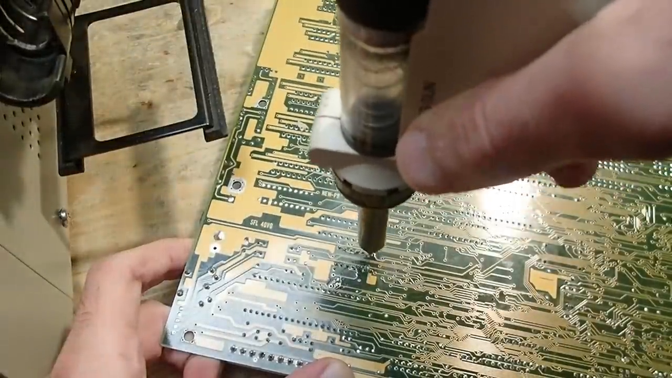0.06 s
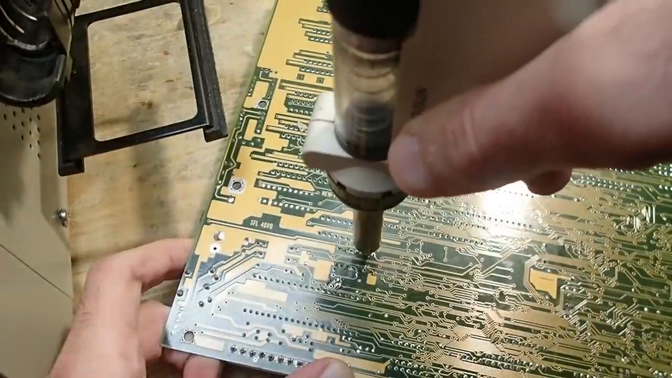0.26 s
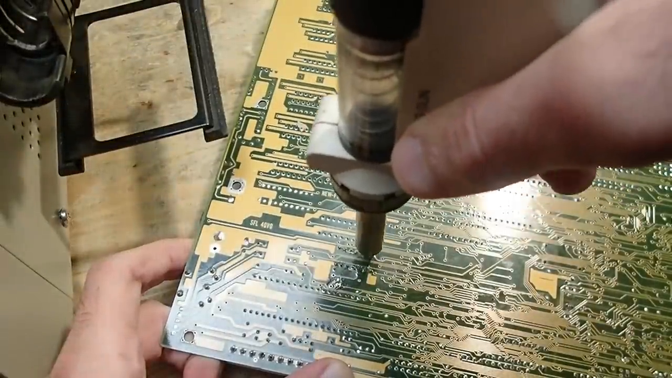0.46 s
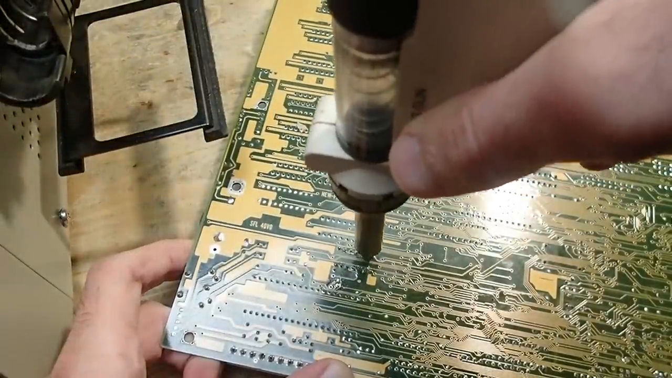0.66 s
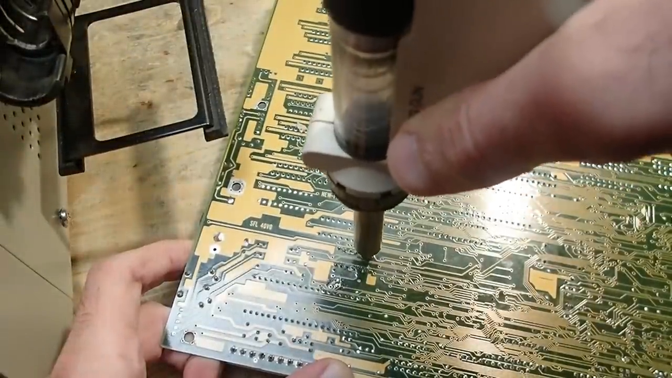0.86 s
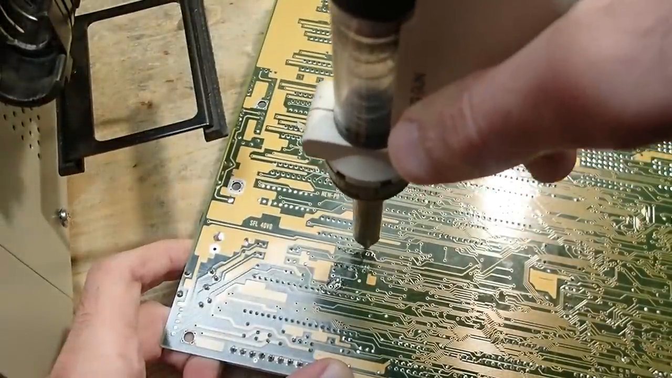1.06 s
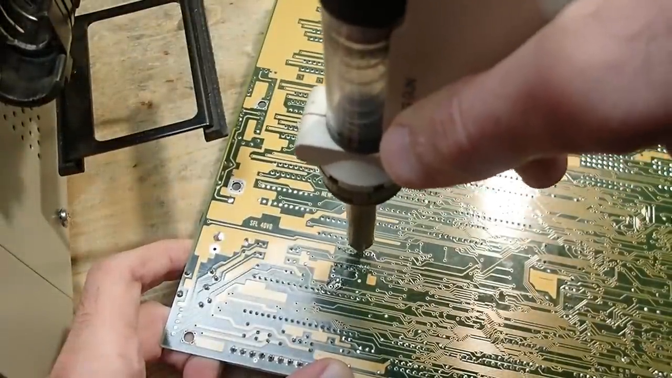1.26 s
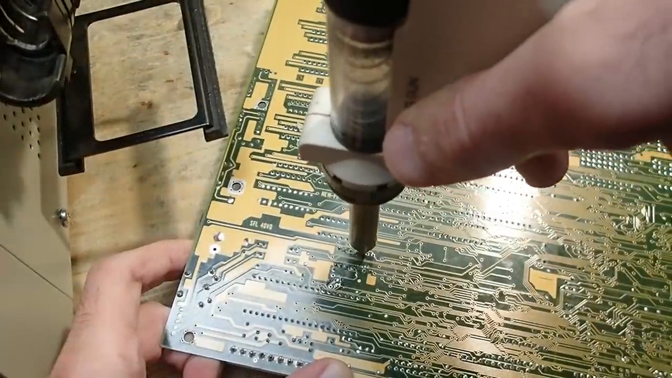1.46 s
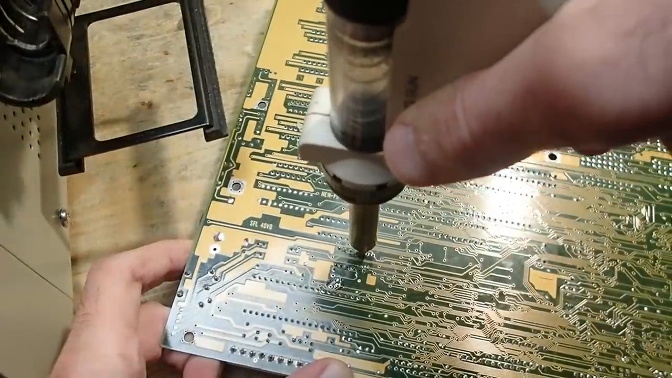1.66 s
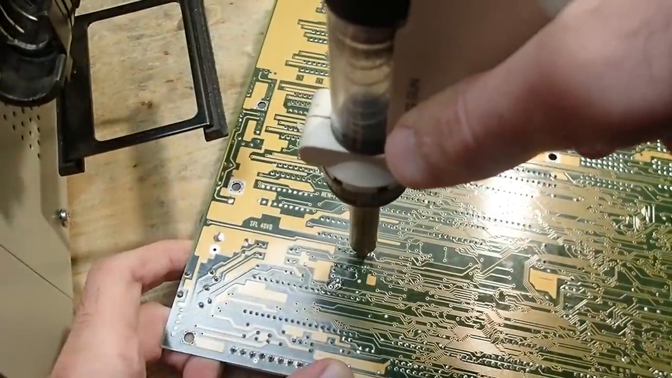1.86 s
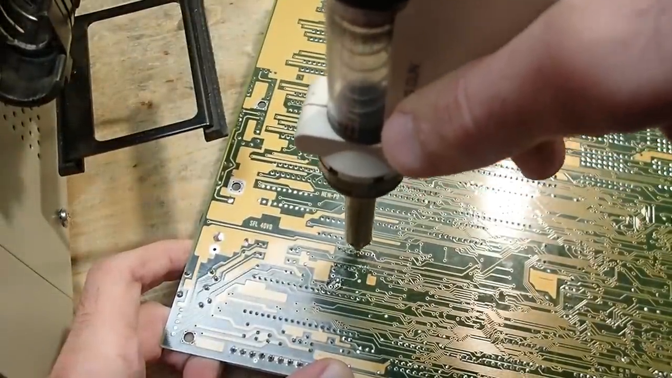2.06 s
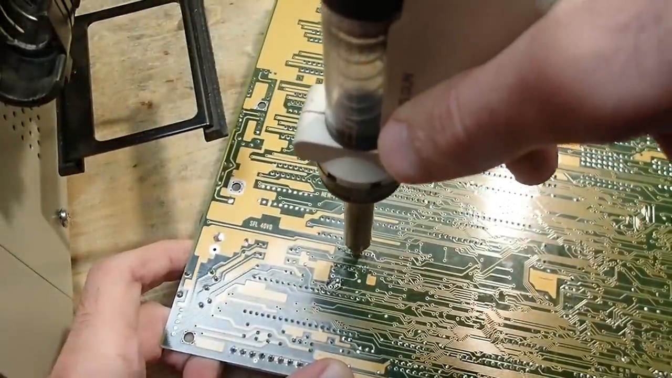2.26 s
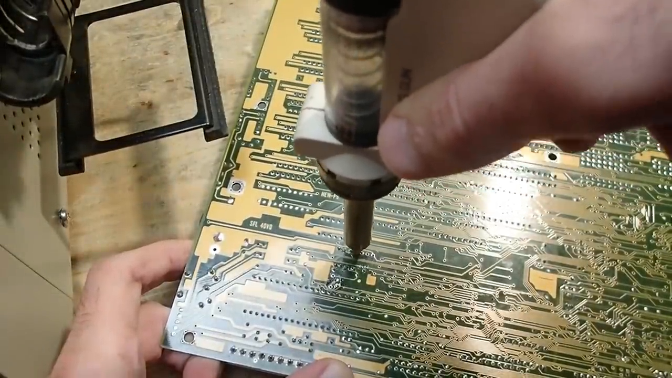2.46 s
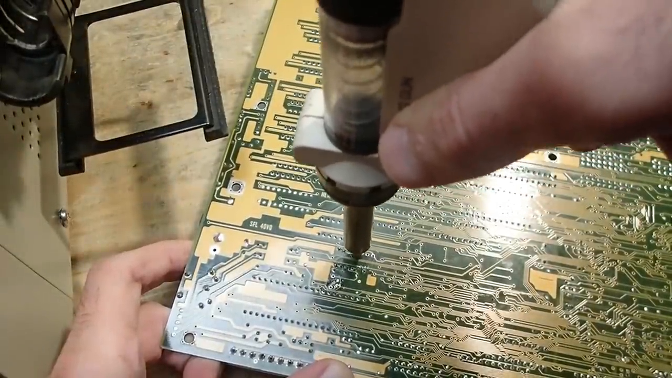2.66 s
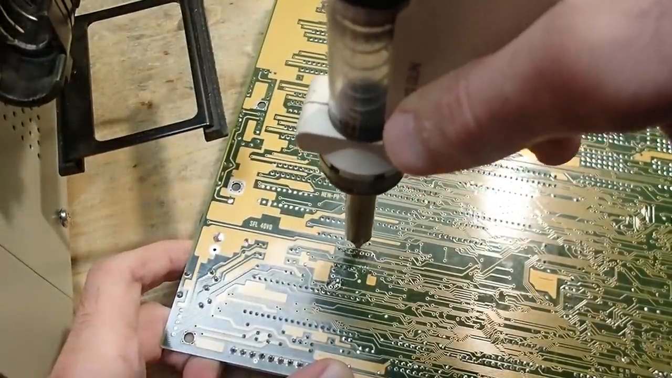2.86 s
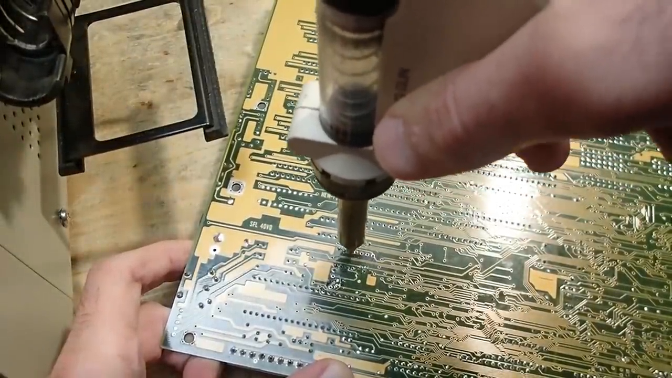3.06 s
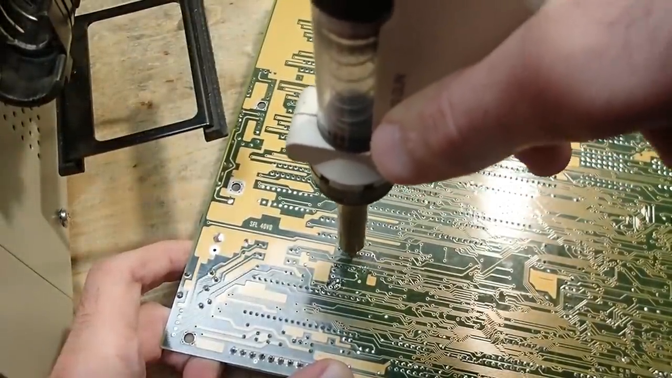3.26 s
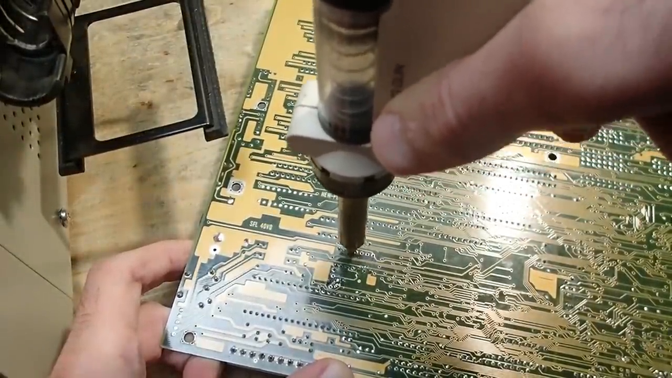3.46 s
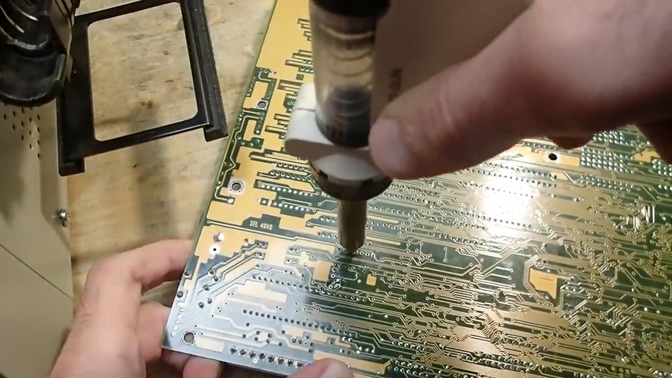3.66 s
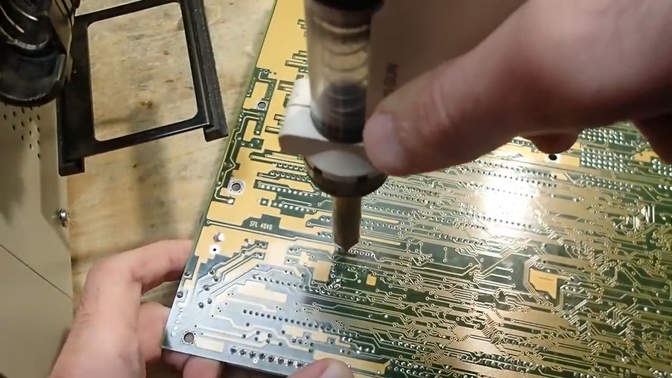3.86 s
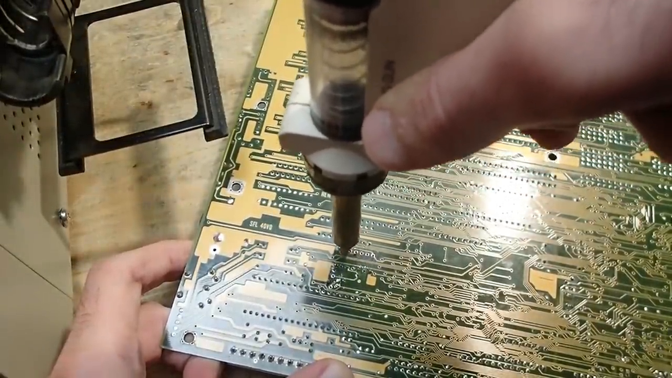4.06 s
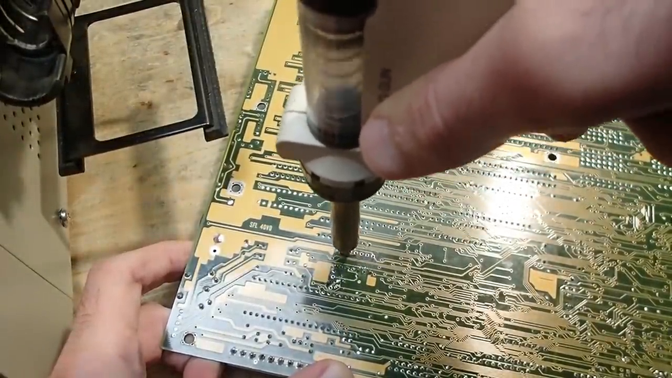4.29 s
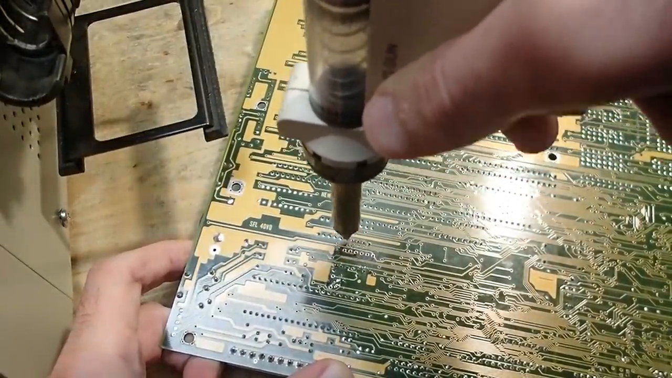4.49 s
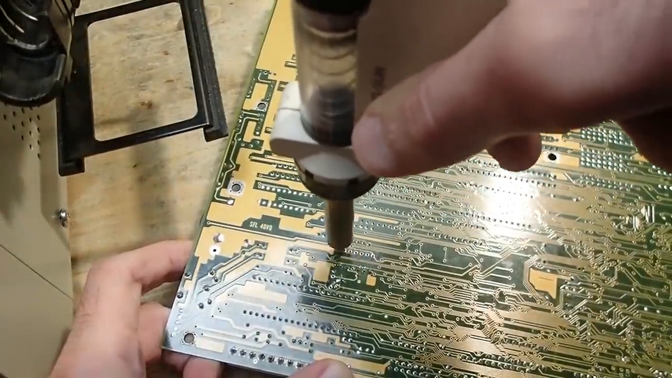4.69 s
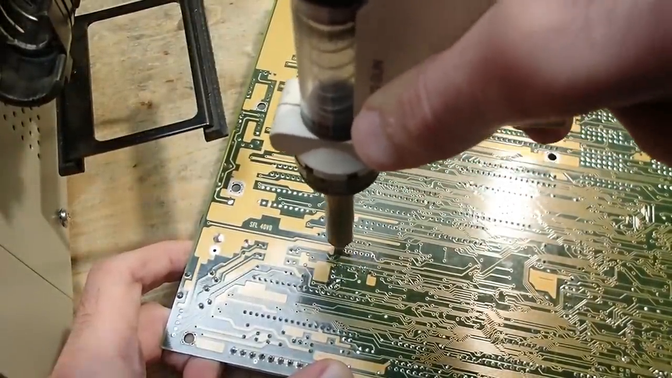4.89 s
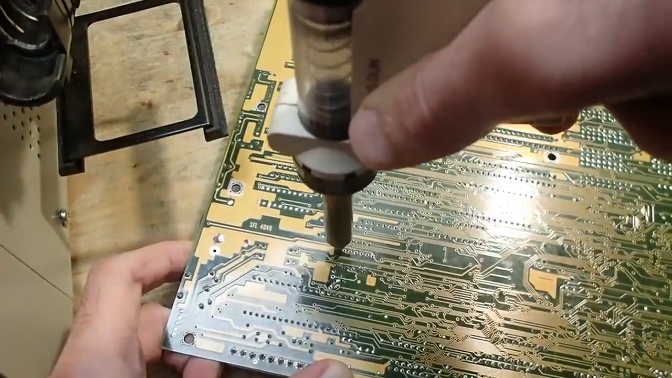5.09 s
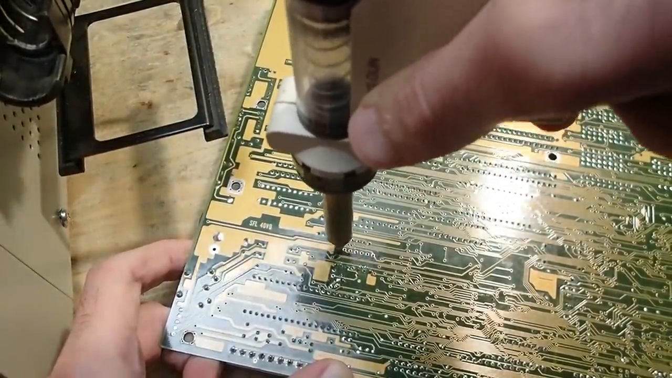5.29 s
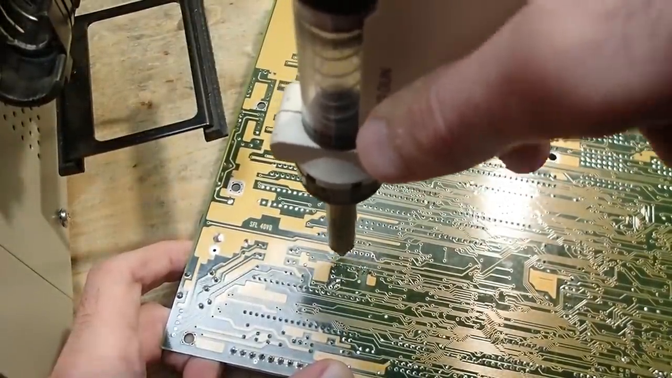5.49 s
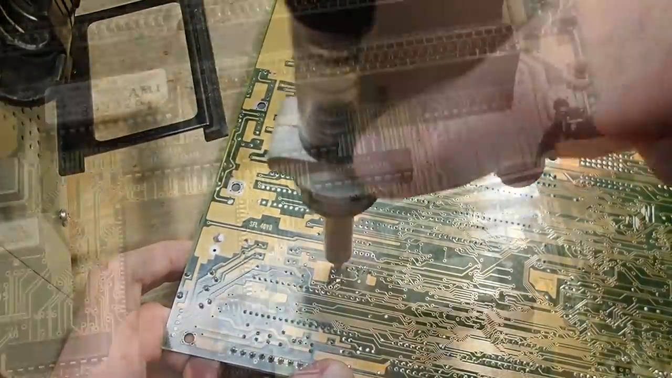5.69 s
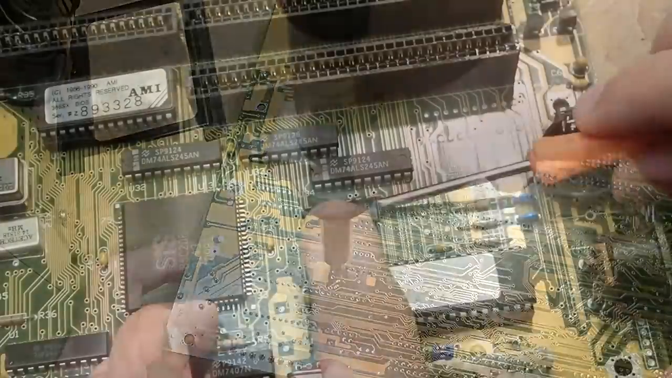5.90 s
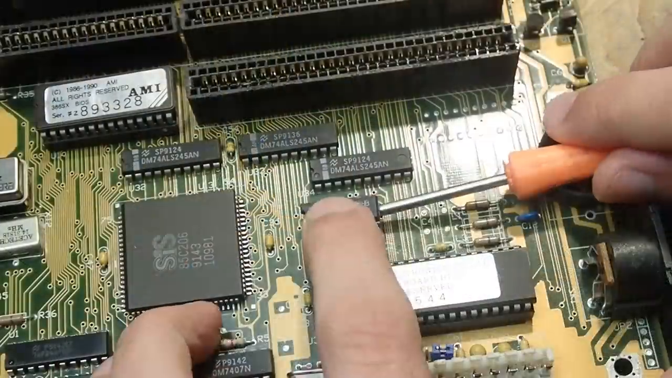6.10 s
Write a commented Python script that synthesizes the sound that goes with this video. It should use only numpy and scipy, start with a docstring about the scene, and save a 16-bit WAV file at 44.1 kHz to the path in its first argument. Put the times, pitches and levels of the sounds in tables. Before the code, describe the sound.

Close by on a workbench, a desoldering gun runs in seven short bursts, the first already ending. Each begins with a sharp switch click, then a little diaphragm pump spins up quickly, rattling, buzzing and hissing air, before another click and a rapid falling coast to silence. Between bursts the metal nozzle lightly ticks and scrapes on pins. A faint hollow hum stays underneath; the microphone is close, the room small and dry.

```python
"""A desoldering gun clears joints on a circuit board, close by on a workbench.
Each pull of the trigger clicks a switch; a small diaphragm pump spins up, rattles, whirs and sucks air,
then coasts to a stop. The pump is already running at the beginning. Starts and stops rock the housing.
In between, the nozzle ticks and scratches on the pins (struck board modes and bursts of noise),
over a faint hollow hum of coloured noise and a wavering tone."""
import sys
import numpy as np
from scipy import signal
from scipy.fft import rfft, irfft
from scipy.io import wavfile

SR = 44100
rng = np.random.default_rng(int(sys.argv[2]) if len(sys.argv) > 2 else 0)


def store_wav(level_fs):
    """Save 16-bit WAV to argv[1]."""
    pcm = np.round(np.clip(np.atleast_2d(level_fs), -1, 1) * 32767)
    wavfile.write(sys.argv[1], SR, pcm.T.astype(np.int16))


N = 270774
TIME = np.arange(N) / SR   # seconds
BINS = np.maximum(np.arange(N // 2 + 1) * SR / N, 1)   # Hz
CUTOFF_HZ = 16000


def from_db(db):
    """Turn decibels into a gain."""
    return 10 ** (np.asarray(db) / 20)


def rms_one(x):
    """Scale a sound to an average strength (rms) of 1."""
    return x / np.sqrt(np.mean(x ** 2) + 1e-20)


def at_hz(points, hz):
    """Read a curve between its points, on a log-frequency axis."""
    f, value = np.transpose(points)
    return np.interp(np.log(hz), np.log(f), value)


def lift(resonances, hz):
    """Rise in dB that a set of resonances gives at a frequency."""
    return sum(db / (1 + (2 * (hz - centre) / width) ** 2) for centre, width, db in resonances)


def drift(rate):
    """Random wander: straight lines between random points of spread 1, 'rate' points a second."""
    points = rng.standard_normal(4096)
    return np.interp(TIME * rate, np.arange(len(points)), points)


# How alike left and right are. Each row: frequency in Hz, likeness from 0 to 1.
LIKENESS = [(40, 0.7), (150, 0), (500, 1), (2500, 0.95), (5000, 0.91), (8000, 0.86), (14000, 0.93)]
# Balance of the two sides. Each row: frequency in Hz, left minus right in dB.
LEAN = [(150, 0), (550, -1.15), (4500, 0.3), (8000, 0.5), (13000, -4.5)]


def noise(shape_db):
    """Coloured stereo noise of rms 1: the sides share a middle part and differ by a side part."""
    mid, side = rfft(rng.standard_normal((2, N))) * from_db(shape_db)
    alike = np.clip(at_hz(LIKENESS, BINS), 0, 1)
    signs = np.array([[1], [-1]])   # left, right
    stereo = np.sqrt(1 + alike) * mid + np.sqrt(1 - alike) * side * signs
    balance = from_db(signs * at_hz(LEAN, BINS) / 2)
    return rms_one(irfft(stereo * balance, N))


def clicks(times, heights):
    """Blows one sample long."""
    out = np.zeros(N)
    at = np.clip((np.asarray(times) * SR).astype(int), 0, N - 1)
    np.add.at(out, at, heights)
    return out


def ring(force, hz, t60):
    """A unit blow sets off a cosine of height 1 that falls 60 dB in t60 seconds."""
    r, w = from_db(-60 / (t60 * SR)), 2 * np.pi * hz / SR
    return signal.lfilter([.5, 0, -.5], [1, -2 * r * np.cos(w), r * r], force + 1e-18)


def strike(times, level_db, modes, spread_db, contact_hz):
    """Each blow excites every mode with a strength of its own; a soft contact dulls the top."""
    chance = spread_db * rng.standard_normal((len(times), len(modes)))
    rings = np.zeros(N)
    for k, (hz, db, t60) in enumerate(modes):
        blows = clicks(times, from_db(level_db + db + chance[:, k]))
        rings += (-1) ** k * ring(blows, hz, t60)   # neighbouring modes start in opposite directions
    soften = signal.butter(2, min(contact_hz, CUTOFF_HZ), fs=SR, output="sos")
    return signal.sosfilt(soften, rings)


def fade(force, t60):
    """Envelope that jumps at each blow and falls 60 dB in t60 seconds."""
    return signal.lfilter([1], [1, -from_db(-60 / (t60 * SR))], force + 1e-18)


def pan(x, left_db):
    """Lean a sound to one side: left minus right in dB."""
    return x * from_db(np.array([[left_db], [-left_db]]) / 2)


def room(x, wet_db, t60):
    """Short diffuse reflections of bench and walls, made of fading noise."""
    t = TIME[:SR // 2]
    tail = rng.standard_normal((2, len(t))) * from_db(-60 * t / t60) * (t > .003)
    tail /= np.sqrt(np.sum(tail ** 2, axis=1, keepdims=True))
    return from_db(wet_db) * signal.fftconvolve(x, tail, axes=1)[:, :N]


# Broad background hiss. Each row: frequency in Hz, relative level per Hz in dB.
HISS = [(30, -39), (80, -14), (140, -4.5), (300, -5), (500, 2.5), (1000, -6), (1650, -10.5), (2300, 0),
        (3300, -6.5), (4800, -11.5), (6500, -31.5), (11000, -30), (13500, -19.5), (15800, -14.5)]
# Resonances that make it hollow. Each row: centre in Hz, width in Hz, lift in dB.
HOLLOW = [(166, 21, 7.6), (553, 78, 18.26), (619.1, 76.6, 21.37), (813, 64, 10.1), (881, 13, 14.2),
          (1177, 133, 10.5), (1940, 85, 7.9), (2296, 93, 4.9), (2702, 174, 10.8), (3470, 230, 8.8),
          (4060, 60, 7.9)]


def hollow_hum(level_db):
    """Steady noise sounds hollow where resonances lift narrow bands of it."""
    return from_db(level_db) * noise(at_hz(HISS, BINS) + lift(HOLLOW, BINS))


def idle_tone(hz, level_db, waver_db):
    """The housing hums faintly near its upper mount resonance: a sine of wavering level."""
    return from_db(level_db + waver_db * drift(7)) * np.sin(2 * np.pi * hz * TIME)


# Colour of the tip scraping on solder. Each row: frequency in Hz, relative level per Hz in dB.
SCRAPE = [(100, -21), (700, 6), (1600, -17), (2600, 0), (4700, 4.5), (6500, -19), (11000, -25)]


def fidget(per_s, level_db, t60):
    """The tip creeps on the solder: faint noise bursts at random moments."""
    heights = (rng.random(N) < per_s / SR) * from_db(level_db) * rng.uniform(0.61, 1, N)
    return fade(heights, t60) * noise(at_hz(SCRAPE, BINS))


# Before each pull the tip is worked onto its pin in a run of light taps.
SEAT_FROM_S, SEAT_UNTIL_S = 0.42, 0.036   # the run starts and ends this long before the pull
TAP_DB, TAP_SPREAD_DB = -47.5, 1.5   # strength before the nozzle's own settings, and its random spread
TAP_EDGE_FIRST_DB, TAP_EDGE_LAST_DB = -23, -7   # bright edge: the taps sharpen as the tip seats


def seating_taps(count):
    """An uneven run of taps leads up to each pull: rows of start in s, strength in dB, bright edge in dB."""
    on = np.array([[pull[0]] for pull in PULLS if pull[0] > 0])
    progress = (np.arange(count) + rng.random((len(on), count))) / count
    s = on - SEAT_FROM_S + progress * (SEAT_FROM_S - SEAT_UNTIL_S)
    db = TAP_DB + TAP_SPREAD_DB * rng.standard_normal(s.shape)
    edge_db = TAP_EDGE_FIRST_DB + progress * (TAP_EDGE_LAST_DB - TAP_EDGE_FIRST_DB)
    return np.column_stack([s.ravel(), db.ravel(), edge_db.ravel()])


# Firm touches of the nozzle on pins and board.
# Each row: start in seconds, strength in dB, bright edge relative to it in dB (both offset in nozzle).
TOUCHES = [(0.6953, -44, -19), (1.2196, -41, -29), (1.6663, -39, -13.5), (2.1978, -44.5, -23),
           (2.4957, -36.5, -21), (3.0002, -33.5, -22.5), (3.1575, -44, -19), (3.3343, -42.5, -12.5),
           (3.4263, -43, -26), (3.9716, -43, -33), (4.1164, -41, -16), (4.1669, -46, -9.5),
           (4.9582, -47, -9.5), (5.909, -44, -32), (6.1108, -39, -20)]
# Ringing modes of the board. Each row: frequency in Hz, relative level in dB, time to fall 60 dB in seconds.
BOARD = [(792, -8, 0.045), (1480, -8.5, 0.065), (2070, -9, 0.097), (2520, 4, 0.039), (2763, 4, 0.045),
         (2880, -17, 0.019), (3470, -1.5, 0.023), (3750, -31, .025), (4000, -5, 0.077), (4730, -12, 0.032),
         (5800, -26, 0.019), (6370, -32, 0.016)]
# Colour of a touch's bright edge. Each row: frequency in Hz, relative level per Hz in dB.
EDGE = [(3000, -20), (6000, 0), (8700, 5.5), (11000, -7), (13000, 11), (16000, 11.5)]


def nozzle(ring_db, edge_db, edge_t60, scrape_db, scrape_t60):
    """The tip hits a pin with a bright edge, scrapes for a moment, and the board rings."""
    s, db, bright_db = np.vstack([TOUCHES, seating_taps(count=3)]).T
    scrape = fade(clicks(s, from_db(db + scrape_db)), scrape_t60) * noise(at_hz(SCRAPE, BINS))
    board = strike(s, db + ring_db, BOARD, spread_db=2.5, contact_hz=7150)
    edge = fade(clicks(s, from_db(db + bright_db + edge_db)), edge_t60) * noise(at_hz(EDGE, BINS))
    return board + scrape + edge


# Colour of the switch's snap. Each row: frequency in Hz, relative level per Hz in dB.
SNAP = [(500, -34), (2000, -11), (3300, -4.5), (4800, -2), (6500, -22), (8300, -4), (10300, -16.5),
        (12400, 0), (13800, -5), (15500, 4)]
PRESS_DB, RELEASE_DB = -21.5, -23.5   # force of the snap at each end of a pull
BOUNCE_S, BOUNCE_DB = 0.0086, -30   # the released trigger springs back and hits its stop


def switch(snap_t60, rise_t60, tail_db, tail_t60):
    """At each press and release the trigger's contact snaps over: a brief, dry, bright burst of noise."""
    on, off = np.transpose(PULLS)[:2]
    force = clicks(on[on > 0], from_db(PRESS_DB)) + clicks(off, from_db(RELEASE_DB))
    force += clicks(off + BOUNCE_S, from_db(BOUNCE_DB))
    chatter = fade(force, snap_t60) - fade(force, rise_t60)
    chatter += from_db(tail_db) * fade(force, tail_t60)
    return chatter * noise(at_hz(SNAP, BINS))


# The housing on its mounts. Each row: frequency in Hz, relative level in dB, time to fall 60 dB in seconds.
MOUNTS = [(141, 0, .27), (167, -6, .36)]


def rocking(start_db, stop_db, start_lag_s, stop_lag_s, push_s):
    """The rotor's reaction pushes the housing at each start and stop, and it booms on its mounts."""
    on, off = np.transpose(PULLS)[:2]
    force = clicks(on[1:] + start_lag_s, from_db(start_db)) + clicks(off + stop_lag_s, from_db(stop_db))
    boom = np.zeros(N)
    for hz, db, t60 in MOUNTS:
        # taking away a shorter ring makes the boom build over a few cycles
        boom += from_db(db) * (ring(force, hz, t60) - ring(force, hz, push_s))
    # a small box radiates little deep bass
    return signal.sosfilt(signal.butter(6, 120, "high", fs=SR, output="sos"), boom)


# Trigger pulls. Each row: press in seconds, release in seconds, full shaft speed in turns per second.
PULLS = [(-0.165, 0.0783, 111.7), (0.7553, 0.9947, 112.5), (1.7006, 1.9316, 113.1), (2.5667, 2.7907, 113.1),
         (3.4931, 3.7166, 112.95), (4.2663, 4.4813, 113.7), (5.0800, 5.3648, 112.65)]
SETTLE_S, SETTLE_SHARE = .046, .17   # the slow last part of the spin-up


def motor(spin_up_s=.0152, brake_s=.026, grip_s=0.015, release_s=0.015, shake_s=0.053, vacuum_s=0.059):
    """Shaft speed in turns per second; running, pumping effort, vacuum and linkage shake as shares."""
    speed, running, effort, vacuum, shake = np.zeros((5, N))
    for on, off, full_hz in PULLS:
        run, coast = np.maximum(TIME - on, 0), np.maximum(TIME - off, 0)
        # the rotor gathers speed fast and creeps to its top; after release the vacuum brakes it
        now = 1 - (1 - SETTLE_SHARE) * np.exp(-run / spin_up_s) - SETTLE_SHARE * np.exp(-run / SETTLE_S)
        now *= (coast < .1) / (1 + (coast / brake_s) ** 2)
        grip = 1 - np.exp(-(run / grip_s) ** 2)
        speed += full_hz * now
        running += (1 - np.exp(-run / 0.013)) * np.exp(-coast / 0.017)
        effort += grip * now ** 0.68 * np.exp(-coast / release_s)
        vacuum += (1 - np.exp(-(run / vacuum_s) ** 2)) * (now > 0)
        # the linkage is shaken while the speed is changing
        shake += (1 - np.exp(-(run / 0.014) ** 4)) * np.exp(-run / shake_s)
        shake += 0.82 * (1 - np.exp(-coast / 0.0096)) * np.exp(-coast / 0.02)
    return speed, running, effort, vacuum, shake


# Air through valves and nozzle. Each row: frequency in Hz, relative level per Hz in dB.
AIR = [(60, -27), (130, -19), (260, -0.5), (1200, 3), (1600, -7.5), (2500, 9.5), (4500, -1), (5100, -3.5),
       (6800, -13), (9000, -8), (11000, -15.5), (13000, -6), (15500, -6)]


def suction(running, turns, shake, vacuum, level_db, puff_depth, rush, seal_db):
    """Air hisses in two puffs a turn, with an extra rush at speed changes and a lift under vacuum."""
    puffs = 1 + puff_depth * np.cos(4 * np.pi * turns)
    flow = from_db(level_db + seal_db * vacuum) * (running + rush * shake)
    return flow * puffs * noise(at_hz(AIR, BINS))


# Modes struck by the loose linkage.
# Each row: frequency in Hz, relative level in dB, time to fall 60 dB in seconds.
RATTLE = [(284, -5, 0.0082), (1120, -11.5, 0.02), (1386, -8.5, 0.023), (1861, -10.5, 0.033),
          (2020, -4, 0.011), (2346, 1, 0.022), (2608, 3.5, 0.019), (3200, -9, 0.0048), (3390, -3.5, 0.014),
          (4420, -38, 0.011), (4580, -12.5, 0.011), (5840, -15, 0.024)]


def rattle(turns, shake, effort, knock_db, steady_db, rebound_s, rebound_db):
    """The linkage knocks twice a turn; while the speed changes it knocks hard and rebounds unevenly."""
    at = np.flatnonzero(np.diff(np.floor(2 * turns)) > 0)   # samples where the stroke reverses
    loose = from_db(knock_db) * shake[at]
    rebounds = at / SR + rebound_s * (.5 + rng.random(len(at)))
    times = np.r_[at / SR, rebounds]
    force = np.r_[loose + from_db(steady_db) * effort[at], from_db(rebound_db) * loose]
    return strike(times, 20 * np.log10(force + 1e-9), RATTLE, spread_db=3.5, contact_hz=6060)


# Whir at full speed, two strokes a turn. Each row: multiple of the stroke rate, relative level in dB.
STROKE_ORDERS = [(1, -17), (2, 1), (3, -12.5), (4, -2), (5, -19), (6, -16.5), (7, -25.5), (8, -29.5),
                 (9, -19), (10, -9), (11, -20), (12, -10.5), (13, -20), (14, -13.5), (15, -13), (16, -49),
                 (17, -18.5), (18, -18), (19, -37), (20, -16.5), (21, -13), (22, -59), (23, -58), (24, -88),
                 (25, -18), (26, -33), (27, -35.5), (28, -41)]
# The two strokes differ, which adds weak lines in between. Each row: frequency in Hz, relative level in dB.
UNEVEN = [(112, -48), (340, -28), (800, -30), (1010, -27), (1400, -38), (2400, -26), (3300, -23),
          (4400, -34), (6200, -48)]
# Housing resonances that the orders sweep through. Each row: centre in Hz, width in Hz, lift in dB.
HOUSING = [(309, 84, 9), (596.2, 158, 32.5), (888, 200, 19.5), (2300, 350, 9), (5000, 470, 3)]
# The valves slap shut crisply only under vacuum.
# Each row: frequency in Hz, change in dB while they are slack.
SLACK = [(340, -5.5), (450, -5.5), (680, 7.5), (900, -10.5), (1400, -13.5), (2500, -9.5), (4500, -29)]


def whir(speed, turns, effort, vacuum, level_db, flutter_db, scatter_hz):
    """Diaphragm pulses: multiples of the shaft speed that swell as they cross housing resonances."""
    full_hz = np.mean([pull[2] for pull in PULLS])
    orders = [(2 * k, db) for k, db in STROKE_ORDERS]
    orders += [(2 * k - 1, at_hz(UNEVEN, (2 * k - 1) * full_hz)) for k, _ in STROKE_ORDERS]
    out, live = np.zeros(N), effort > 1e-4
    for k, db in orders:
        high = min(k * full_hz / scatter_hz, 1)   # low orders keep in step, high ones scatter and flutter
        gain_db = db + lift(HOUSING, k * speed[live]) - lift(HOUSING, k * full_hz)
        gain_db += flutter_db * high * drift(70)[live]
        gain_db += at_hz(SLACK, k * full_hz) * (1 - vacuum[live])
        phase = 2 * np.pi * k * turns[live] + high * rng.uniform(-np.pi, np.pi)
        out[live] -= from_db(gain_db) * np.cos(phase)
    return from_db(level_db) * effort * out


def scene():
    """Pump, trigger and nozzle over the idle hum."""
    hum = hollow_hum(level_db=-54.0)
    tone = idle_tone(hz=165.3, level_db=-75.0, waver_db=5.5)
    ticks = nozzle(ring_db=-15.5, edge_db=4.0, edge_t60=0.025, scrape_db=-15.0, scrape_t60=0.053)
    ticks += fidget(per_s=11.0, level_db=-64.0, t60=0.038)
    trigger = switch(snap_t60=0.0059, rise_t60=0.0032, tail_db=-21.5, tail_t60=0.048)
    boom = rocking(start_db=-42.5, stop_db=-41.0, start_lag_s=0.0321, stop_lag_s=0.023, push_s=0.036)

    speed, running, effort, vacuum, shake = motor()
    turns = np.cumsum(speed) / SR
    air = suction(running, turns, shake, vacuum, level_db=-50.5, puff_depth=0.2, rush=1.6, seal_db=2.5)
    pump = rattle(turns, shake, effort, knock_db=-32.5, steady_db=-64.0, rebound_s=.003, rebound_db=-9.0)
    pump += whir(speed, turns, effort, vacuum, level_db=-35.5, flutter_db=0.5, scatter_hz=2820)

    gun = pan(pump + ticks, left_db=0.0) + pan(air, left_db=1.5)
    gun += pan(boom, left_db=4.5) + pan(trigger, left_db=-1.0)
    background = pan(hum, left_db=1.0) + pan(tone, left_db=5.5)
    return gun + room(gun, wet_db=-22.5, t60=0.22) + background


def record(dry):
    """Cut the top steeply above the cutoff."""
    return signal.sosfilt(signal.ellip(12, .1, 80, CUTOFF_HZ, fs=SR, output="sos"), dry)


dry = scene()
out = record(dry)
store_wav(out)
```